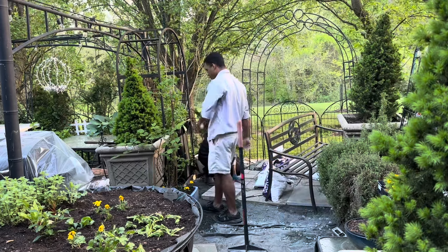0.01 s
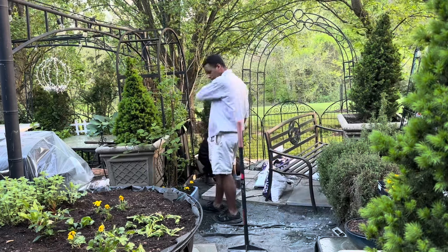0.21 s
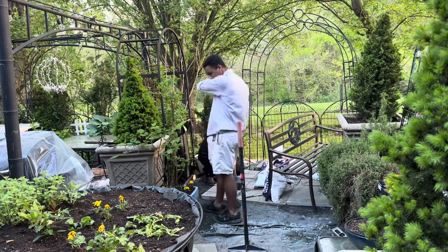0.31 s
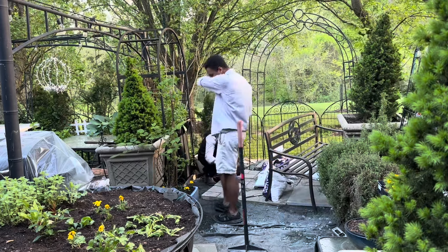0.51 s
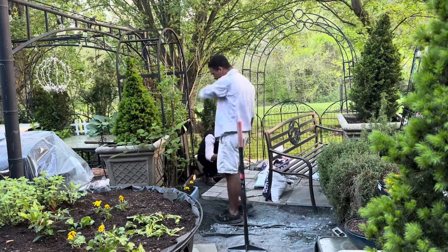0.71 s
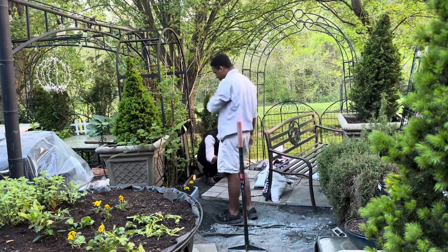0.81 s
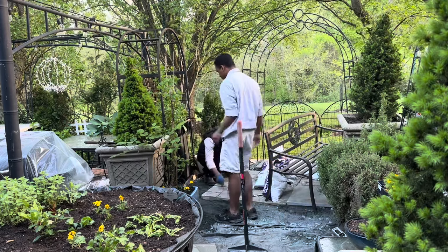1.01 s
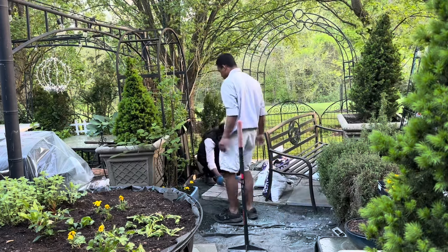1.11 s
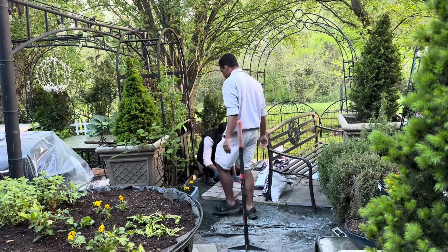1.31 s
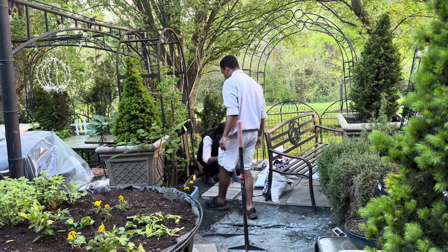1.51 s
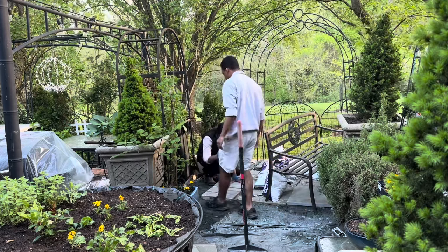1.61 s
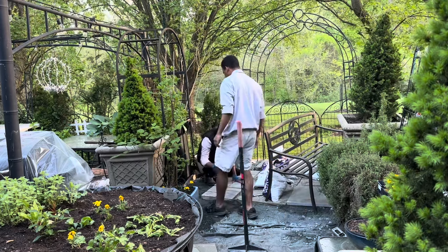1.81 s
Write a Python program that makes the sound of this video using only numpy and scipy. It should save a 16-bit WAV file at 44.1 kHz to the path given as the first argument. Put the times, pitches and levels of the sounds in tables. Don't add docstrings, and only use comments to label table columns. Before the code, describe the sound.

Two weighty block impacts on paving, about eight tenths of a second apart, with short outdoor scatter; a sleeve rustles before, grit scuffs between and after, over quiet traffic, leaf hiss and thin bird whistles.

```python
import sys
import numpy as np
from scipy import signal
from scipy.fft import rfft, irfft
from scipy.io import wavfile

SR = 44100
rng = np.random.default_rng(int(sys.argv[2]) if len(sys.argv) > 2 else 0)


def to_wav(s):
    ch = np.atleast_2d(s).T
    pcm = np.round(np.clip(ch, -1, 1) * 32767)
    wavfile.write(sys.argv[1], SR, pcm.astype(np.int16))


def attenuation_scalar(level_db):
    decades = np.asarray(level_db, float) / 20
    return 10 ** decades


N = 81585
T = np.arange(N) / SR

BLOW_START = [
    .1997,
    1.0303,
]
# snap in dB, grit in dB, scatter in dB, scatter tilt in dB per octave.
BLOW_LEVELS = [
    (3.5, -16.5, -32.5, 0.),
    (-18, -18.5, -36.5, -0.16),
]
# frequency in Hz, correlation from -1 to 1.
FAR_LIKENESS = [(60, 0.98), (180, 0.91), (550, 0.43), (1650, -0.1), (4970, 1), (15000, -0.3)]
# frequency in Hz, correlation from -1 to 1.
NEAR_LIKENESS = [(500, 0.63), (1300, 0.45), (3000, 0.77), (8000, .6), (14000, 0.13)]


def rms_one(x):
    return x / np.sqrt(np.mean(x ** 2) + 1e-20)


def at_hz(points, hz):
    table_hz, values = np.array(points).T
    return np.interp(np.log(hz), np.log(table_hz), values)


def drift(rate_hz):
    pole = np.exp(-2 * np.pi * rate_hz * 40 / SR)
    noise = rng.standard_normal(N // 40 + 2002)
    slow = signal.lfilter([1], [1, -2 * pole, pole * pole], noise)[2000:]
    return np.interp(np.arange(N) / 40, np.arange(len(slow)), rms_one(slow))


def bands(spectrum, alike, patchy_db, rate, low_hz, grain_db=0., count=2.5):
    edges = low_hz * 2 ** np.arange(0, np.log2(17000 / low_hz), 1 / count)
    centres = np.sqrt(edges[1:] * edges[:-1])
    grains = attenuation_scalar(grain_db * np.minimum(rng.exponential(1, N), 4))
    white = rng.standard_normal((2, 2, N)) * grains
    together = drift(rate / 3)
    out = []
    for k, hz in enumerate(centres):
        band = signal.butter(2, edges[k:k + 2], "band", fs=SR, output="sos")
        mid, side = signal.sosfilt(band, white[k % 2])
        likeness = np.clip(at_hz(alike, hz), -1, 1)
        gain = attenuation_scalar(at_hz(spectrum, hz) + patchy_db * (.6 * together + drift(rate)))
        stereo = np.sqrt(1 + likeness) * mid + np.sqrt(1 - likeness) * side * [[1], [-1]]
        out.append(gain * stereo)
    return centres, rms_one(np.array(out)) / np.sqrt(len(out))


def noise_bed(*args, **settings):
    return bands(*args, **settings)[1].sum(axis=0)


def strokes(rows):
    out = 0
    for start, rise, hold, fall, db in rows:
        attack = np.sin(np.pi / 2 * np.clip((T - start) / rise, 0, 1)) ** 2
        out = out + attack * attenuation_scalar(db - 20 * np.maximum(T - start - rise - hold, 0) / fall)
    return out


def resonate(x, hz, width_hz):
    pole = np.exp(-np.pi * width_hz / SR)
    top = (1 - pole * pole) / 2
    return signal.lfilter([top, 0, -top], [1, -2 * pole * np.cos(2 * np.pi * hz / SR), pole * pole], x)


def traffic():
    # frequency in Hz, density in dB per Hz.
    rumble = [(30, -54), (55, -1.5), (90, -7.5), (134, -16.5), (960, -27.5), (1500, -40), (2300, -42.5),
              (4000, -58.5)]
    return attenuation_scalar(-44) * noise_bed(rumble, FAR_LIKENESS, patchy_db=1.13, rate=11.0, low_hz=24.49)


def drone():
    # time in seconds, firing rate in Hz, level in dB.
    course = [(0, 109.2, -52.5), (.3, 92.74, -48), (0.501, 93.36, -56.5), (0.719, 98.6, -52),
              (1.0, 98.13, -40.5), (1.15, 100.8, -50), (1.3, 105.6, -43.5), (1.5, 106, -46.5),
              (1.85, 109.3, -48)]
    s, hz, db = np.transpose(course)
    phase = 2 * np.pi * np.cumsum(np.interp(T, s, hz) * (1 + 0.0084 * drift(18))) / SR
    loudness = attenuation_scalar(np.interp(T, s, db) + 2.7 * drift(25))
    return np.sqrt(2) * loudness * (np.sin(phase) + 0.088 * np.sin(2 * phase))


def leaves():
    # frequency in Hz, density in dB per Hz.
    hiss = [(3000, 16), (5000, 1), (7500, -28), (9000, -24), (10900, 20.5), (12000, 5), (13300, -22),
            (16000, -25)]
    return attenuation_scalar(-81.5) * noise_bed(hiss, FAR_LIKENESS, patchy_db=1.0, rate=21.0, low_hz=2510, count=6)


def birds():
    # start in seconds, length in seconds, from Hz, to Hz, level in dB.
    whistles = [
        (.51, .05, 2500, 2450, -76),
        (.6, .085, 2250, 2200, -71),
        (1.11, .08, 2080, 2150, -69),
        (1.18, .09, 2150, 2150, -71),
        (1.32, .1, 7500, 7300, -88),
    ]
    out = np.zeros((2, N))
    for start, length, from_hz, to_hz, db in whistles:
        u = np.clip((T - start) / length, 0, 1)
        phase = 2 * np.pi * np.cumsum(from_hz + (to_hz - from_hz) * u) / SR
        blur_hz = 6e-6 * to_hz ** 2
        depth = blur_hz / 150
        swell = attenuation_scalar(db) * np.sqrt(np.sin(np.pi * u) + 1e-12) * (u > 0) * (u < 1)
        for side in out:
            tone = (1 + depth * drift(blur_hz)) * np.sin(phase) + depth * drift(blur_hz) * np.cos(phase)
            side += swell * tone
    return out


def cloth():
    # start, rise, hold and fall in seconds, level in dB.
    rustles = [
        (-.03, 0.025, .03, .08, -61),
        (.06, 0.029, .025, .07, -59.5),
        (1.668, 0.0091, .17, .05, -67),
        (1.72, 0.0086, 0.017, 0.018, -69),
    ]
    # frequency in Hz, density in dB per Hz.
    fabric = [(880, -32), (1500, -3.5), (2320, -11.5), (7760, -13), (9750, -6), (10300, -9), (14100, -6.5),
              (16000, -30)]
    # frequency in Hz, width in Hz, gain in dB.
    squeaks = [(5560, 50, -9), (7490, 170, 2), (14600, 200, 4)]
    noise = noise_bed(fabric, NEAR_LIKENESS, patchy_db=2.5, rate=8.3, low_hz=1440, grain_db=2.0, count=4)
    squeal = sum(attenuation_scalar(db) * resonate(noise, hz, width_hz) for hz, width_hz, db in squeaks)
    return strokes(rustles) * (noise + squeal)


def scuffs():
    # start, rise, hold and fall in seconds, level in dB.
    scrapes = [
        (.73, 0.02, 0.0095, 0.072, -51.5),
        (.805, 0.0076, .025, 0.052, -60),
        (1.533, 0.0026, 0.01, 0.05, -62),
        (1.665, 0.015, .17, 0.038, -54.5),
        (1.73, 0.034, 0.028, 0.042, -63),
    ]
    # frequency in Hz, density in dB per Hz.
    grit = [(500, -1.5), (1000, 3), (2000, -2.5), (3000, -9.5), (4300, -12.5), (5300, -24), (9000, -24.5),
            (15000, -34)]
    noise = noise_bed(grit, NEAR_LIKENESS, patchy_db=2.0, rate=31.0, low_hz=477.5, grain_db=2.5, count=3.5)
    return strokes(scrapes) * noise


def scatter():
    # frequency in Hz, density in dB per Hz.
    colour = [(59, -29), (100, -15.5), (177, -8), (991, -25.5), (7940, -46.5), (9410, -47), (10900, -51),
              (16000, -54)]
    # frequency in Hz, t60 in seconds.
    tail_t60 = [(150, 0.5), (1000, 0.34), (4000, 0.33), (12000, 0.33)]
    # frequency in Hz, correlation from -1 to 1.
    likeness = [(150, 0.86), (400, 0.36), (1500, 0.43), (5000, 0.35), (12000, 0.)]
    early_db, early_t60_s, rise_s = 8.5, 0.035, 0.00055
    centres, noise = bands(colour, likeness, patchy_db=2.53, rate=71.0, low_hz=111.1)
    out = 0
    for start, (*_, db, tilt_db) in zip(BLOW_START, BLOW_LEVELS):
        t = np.maximum(T - start - .002, 0)
        tail = attenuation_scalar(-60 * t / at_hz(tail_t60, centres)[:, None])
        early = attenuation_scalar(early_db - 60 * t / early_t60_s)
        strength = attenuation_scalar(db + tilt_db * np.log2(centres / 500))[:, None]
        env = strength * (tail + early) * (1 - np.exp(-t / rise_s))
        out = out + (noise * env[:, None]).sum(axis=0)
    return out


def cracks():
    delays = [
        .0015,
        .001,
    ]
    # frequency in Hz, density in dB per Hz.
    colours = [
        [(900, -53), (2000, -3), (3500, -4.5), (6000, -13.5), (8000, -17), (11000, -30), (14000, -32),
         (16500, -46)],
        [(1200, -50), (2100, -5), (3500, -5), (5000, -16), (7500, -7), (11000, -10.5), (14000, -6),
         (16500, -14)],
    ]
    t60_s, rise_s = .006, 0.00017
    out = np.zeros((2, N))
    hz = np.fft.rfftfreq(N, 1 / SR) + 1
    for start, delay, (snap_db, grit_db, *_), colour in zip(BLOW_START, delays, BLOW_LEVELS, colours):
        noise = rng.standard_normal(N) + .45 * rng.standard_normal((2, N))
        t = T - start - delay
        burst = noise * attenuation_scalar(grit_db - 60 * np.maximum(t, 0) / t60_s) * np.exp(np.minimum(t, 0) / rise_s)
        burst[:, int((start + delay) * SR)] -= attenuation_scalar(snap_db)
        out += irfft(rfft(burst) * attenuation_scalar(at_hz(colour, hz)), N)
    return out


def thuds():
    # frequency in Hz, first blow in dB, second blow in dB, t60 in seconds.
    modes = [(57, -34, -25, .14), (100, -12.5, -11.5, .097), (172, -24, -23, .13), (177, -10, -9, .045),
             (229, -26, -21, .03), (330, -17, -22, .05), (361, -13, -11, .04), (500, -20, -31, .04),
             (612, -28, -21, .026), (748, -15.5, -30, .036), (1190, -27, -31, .036), (1700, -29, -48, .02)]
    swell_cycles, lag_cycles = 1.095, .087
    out = np.zeros(N)
    for k, start in enumerate(BLOW_START):
        t = np.maximum(T - start, 0)
        for hz, *db, t60 in modes:
            swell = 1 - np.exp(-(t * hz / swell_cycles) ** 3)
            ring = np.cos(2 * np.pi * (t * hz - lag_cycles))
            out -= attenuation_scalar(db[k] - 60 * (t - 1 / hz) / t60) * swell * ring
    return signal.lfilter(*signal.butter(2, 24, "high", fs=SR), out)


def scene():
    background = traffic() + leaves() + birds()
    low_tones = (drone() + thuds()) * attenuation_scalar(np.array([[-.3], [.3]]))
    return background + cloth() + scuffs() + scatter() + cracks() + low_tones


def low_pass(x):
    return signal.sosfilt(signal.butter(12, 16510, fs=SR, output="sos"), x)


def record(dry):
    # low edge in Hz, high edge in Hz.
    gaps = [(8950, 9900), (12200, 13100)]
    sos = [signal.cheby2(4, 14, 15500, fs=SR, output="sos")]
    for low, high in gaps:
        sos.append(signal.cheby2(3, 22, [low + 60, high - 60], "bandstop", fs=SR, output="sos"))
    mix = signal.sosfilt(np.vstack(sos), dry)
    return low_pass(mix)


dry = scene()
out = record(dry)
to_wav(out)
```